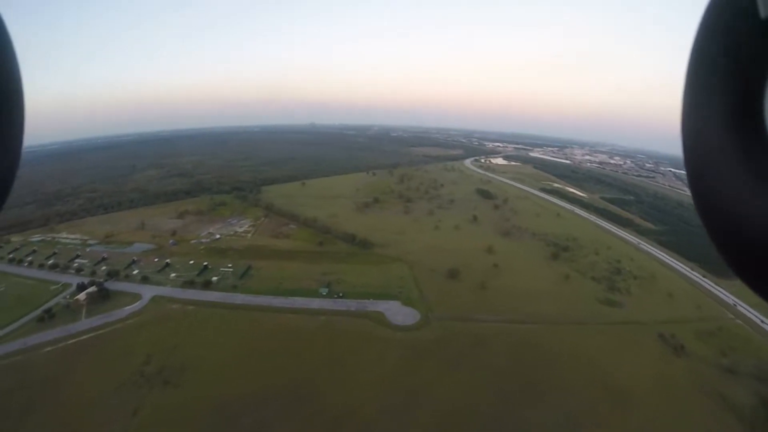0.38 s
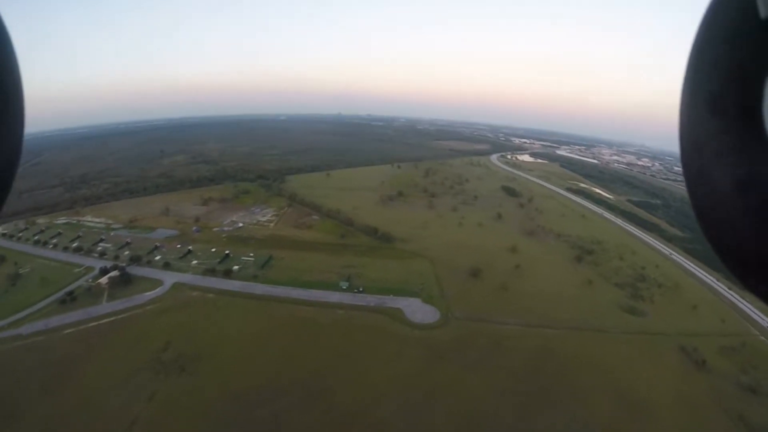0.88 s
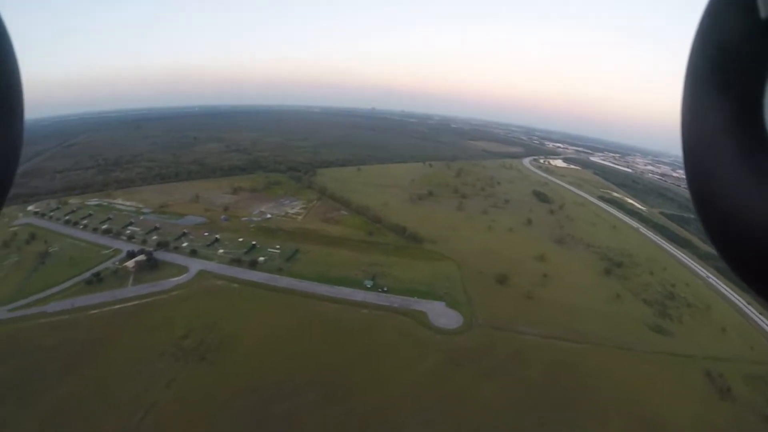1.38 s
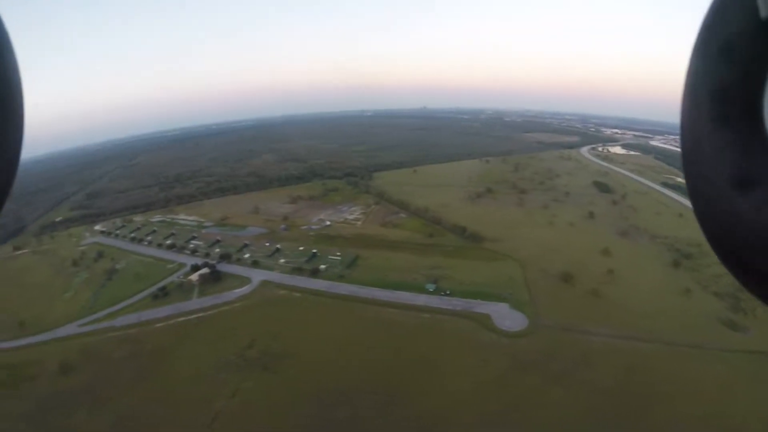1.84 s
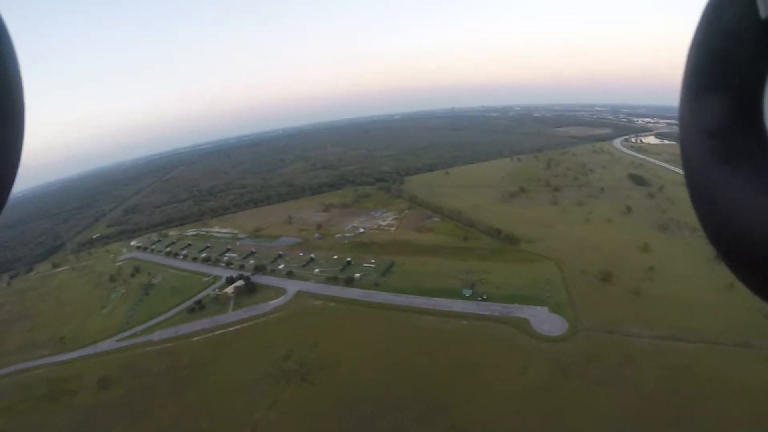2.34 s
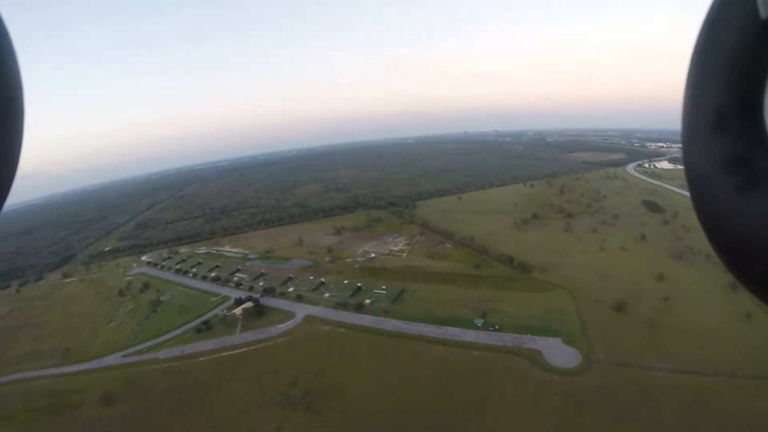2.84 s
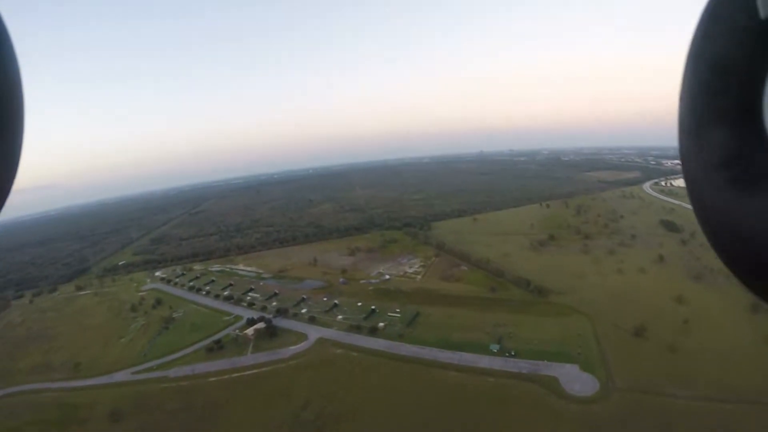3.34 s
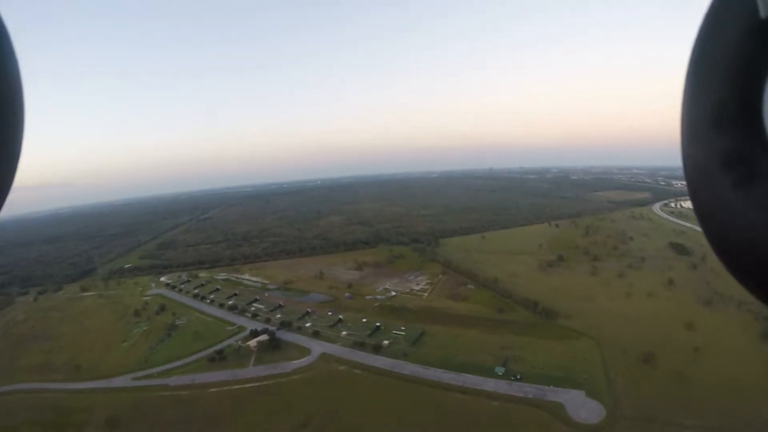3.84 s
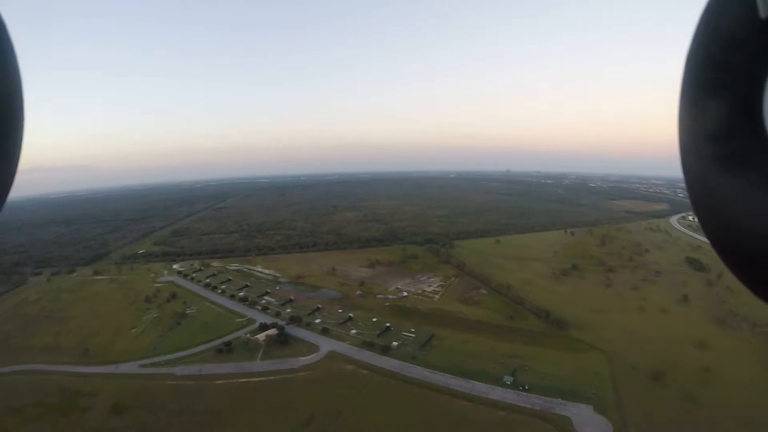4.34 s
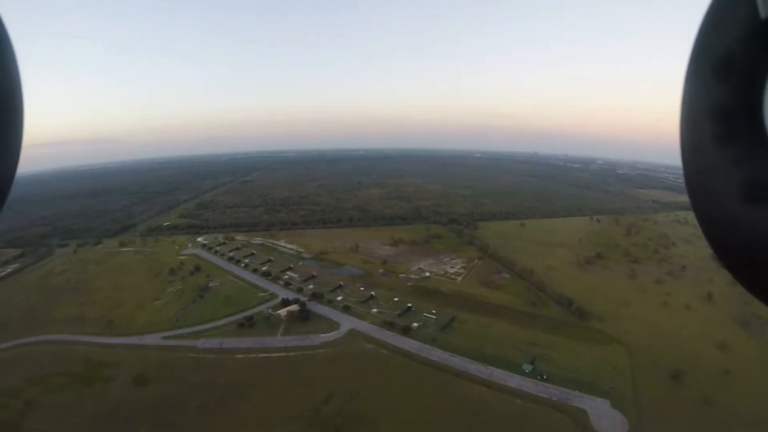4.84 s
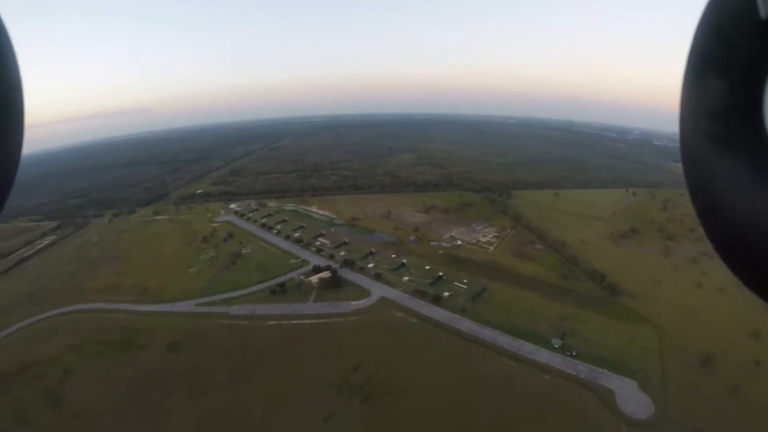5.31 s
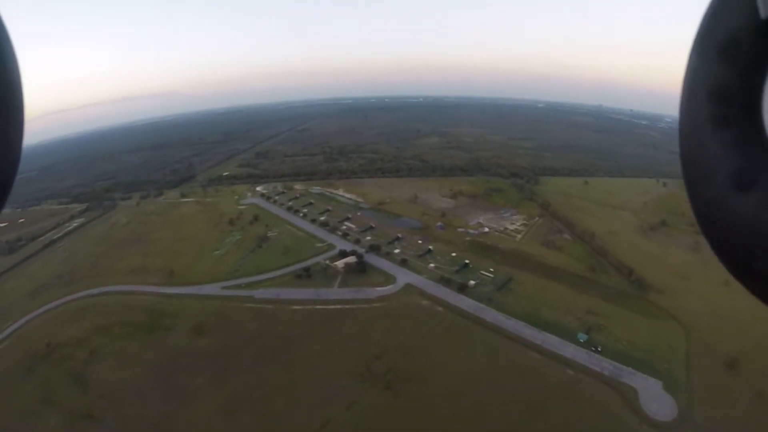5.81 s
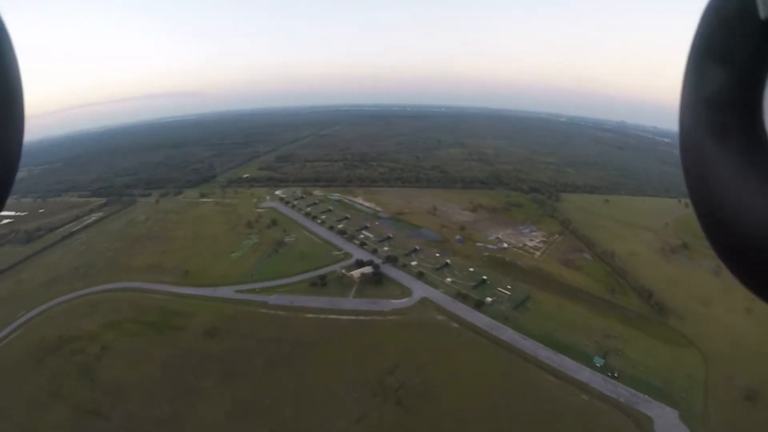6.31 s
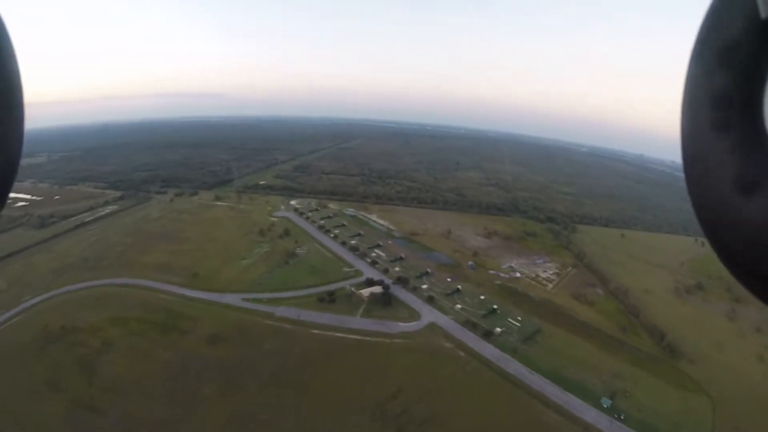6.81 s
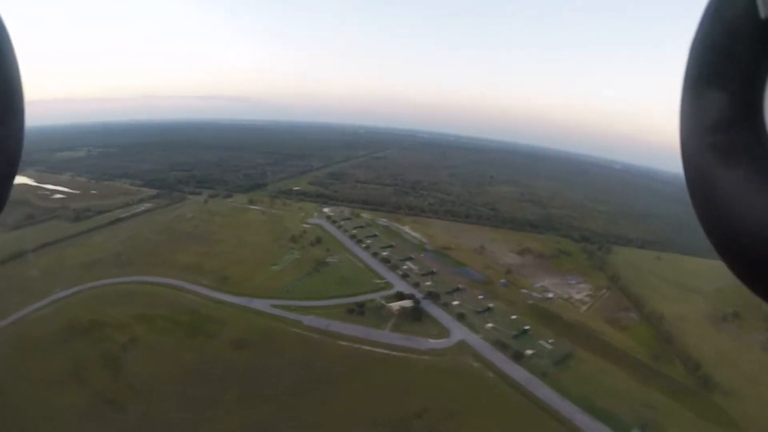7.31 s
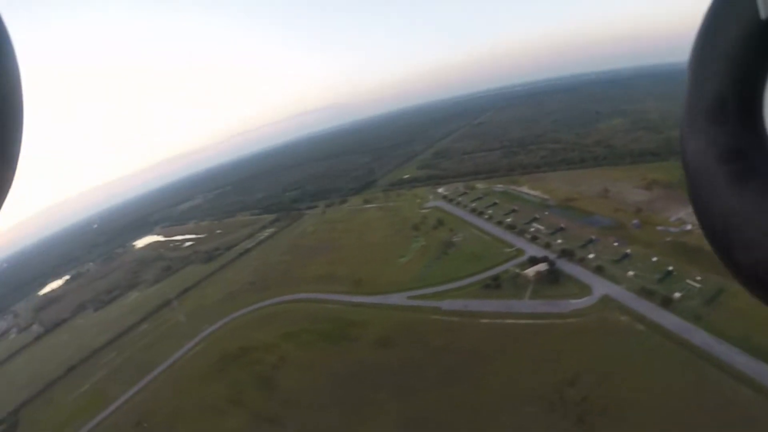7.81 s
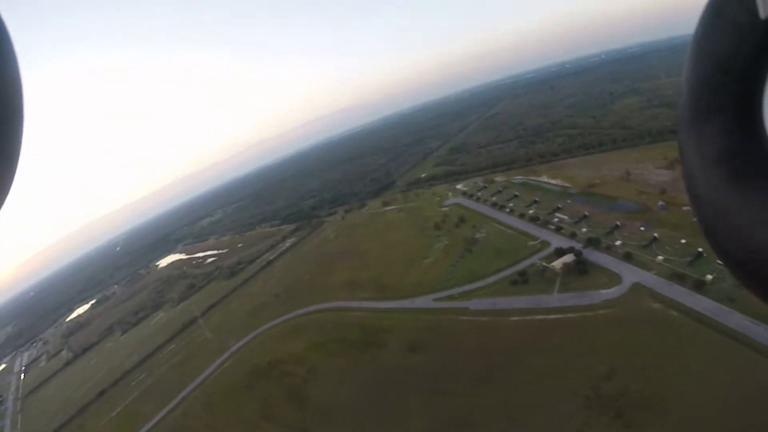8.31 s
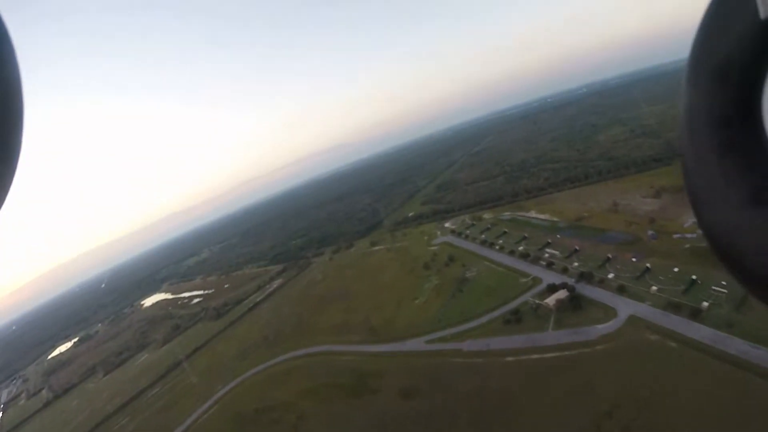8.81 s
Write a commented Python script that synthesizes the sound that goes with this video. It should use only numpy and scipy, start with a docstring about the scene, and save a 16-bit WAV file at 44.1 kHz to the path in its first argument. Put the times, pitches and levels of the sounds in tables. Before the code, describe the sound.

Close on-board drone of a little electric propeller plane, low buzzing hum with fluttering air hiss, faint high whine, thin ticks and rattling knocks.

```python
"""Model aeroplane in level flight

A small electric aeroplane, heard from a camera fixed to its frame, with no room around.
Gusts shake two wing bending modes; blows ring the camera housing as knocks and thin ticks.
Propeller wash is noise coloured by the housing: rush, blade hiss and a rattle at each blade pass.
The motor's magnets whine 42 times a turn; the shaft shakes the frame once a turn, with overtones."""
import sys
import numpy as np
from scipy import signal
from scipy.fft import rfft, irfft
from scipy.io import wavfile
from scipy.ndimage import uniform_filter1d

SR = 44100
rng = np.random.default_rng(int(sys.argv[2]) if len(sys.argv) > 2 else 0)


def master(y):
    """Save y as 16-bit WAV."""
    cut = np.clip(np.atleast_2d(y).T, -1, 1)
    pcm = np.round(cut * 32767)  # scale
    wavfile.write(sys.argv[1], SR, pcm.astype(np.int16))


def volts_from_decibels(level):
    """Turn decibel levels (scalar or array-like) into linear amplitude factors."""
    exponent = np.asarray(level, float) / 20
    return 10 ** exponent


N = 393359


def walk(rate_hz):
    """Random levels held 1 / rate_hz and slewed twice; rms about 0.73."""
    hold = int(SR / rate_hz)
    steps = np.repeat(rng.standard_normal(N // hold + 1), hold)
    return 0.99 * uniform_filter1d(uniform_filter1d(steps, hold), hold)[:N]


def unit(x):
    """Scale to rms 1."""
    return x / np.sqrt(np.mean(x ** 2))


def band(x, lo_hz, hi_hz):
    """Gentle band-pass."""
    return signal.sosfilt(signal.butter(2, [lo_hz, hi_hz], "band", fs=SR, output="sos"), x)


def curves(table):
    """Columns of a table as one value a sample."""
    time_s, *columns = np.transpose(table)
    return [np.interp(np.arange(N) / SR, time_s, column) for column in columns]


# stronger gusts on the wing: (time [s], level over the usual shake [dB])
GUSTS = [(0.0, 6), (2.4, 5), (6.0, 3.5), (7.5, 5.5), (8.4, 4)]


def gust_level():
    """Gust strength wanders; each stronger gust adds a bell-shaped swell in dB."""
    usual_db, swell_s = -31.5, 0.2
    t_s = np.arange(N) / SR
    swells_db = sum(db * np.exp(-((t_s - s) / swell_s) ** 2) for s, db in GUSTS)
    return usual_db + 1.0 * walk(3.3) + swells_db


# wing bending modes: (frequency [Hz], width of one filter pass [Hz], relative level [dB])
WING_MODES = [(76.2, 14.5, -0.5), (88.2, 15, -6)]


def wing(gust_db):
    """Gusts shake two bending modes: noise through each resonance twice."""
    bending = 0
    for hz, width_hz, db in WING_MODES:
        b, a = signal.iirpeak(hz, hz / width_hz, SR)
        noise = rng.standard_normal(N)
        mode = signal.lfilter(b, a, signal.lfilter(b, a, noise))
        bending = bending + volts_from_decibels(db) * unit(mode)
    return volts_from_decibels(gust_db) * bending


# housing response between resonances: (frequency [Hz], relative density [dB per Hz])
HOUSING_WALL = [(20, -14), (29, 0), (50, 0), (110, -6), (170, -8), (300, -1.5), (850, -4.5), (1050, -11),
                (2800, -12.5), (3100, -17.5), (4500, -24), (6300, -33), (6900, -31.5), (8800, -42.5),
                (12000, -49), (15000, -52)]
# housing resonances: (frequency [Hz], width [Hz], relative density at the top [dB per Hz])
HOUSING_MODES = [(209, 11, -2), (709, 71, 0), (1337, 58, -7.5), (1537, 220, -4.5), (1696, 210, -4),
                 (2036, 136, -2.5), (2214, 260, -8), (2643, 240, -11.5), (3517, 410, -15.5),
                 (4920, 290, -21.5), (5470, 360, -23.5), (5720, 340, -30), (6010, 300, -19.5),
                 (6300, 320, -23.5), (10280, 1500, -38), (13500, 800, -51)]


def housing_ring():
    """Causal (minimum-phase) response of the housing: a sloping wall plus steep-sided resonances."""
    size = 8192
    hz = np.maximum(np.arange(size // 2 + 1) * SR / size, 1)
    wall_hz, wall_db = np.transpose(HOUSING_WALL)
    power = volts_from_decibels(np.interp(np.log(hz), np.log(wall_hz), wall_db)) ** 2
    for mode_hz, width_hz, db in HOUSING_MODES:
        power = power + (volts_from_decibels(db) / (1 + (2 * (hz - mode_hz) / width_hz) ** 2)) ** 2
    # fold the cepstrum onto positive time
    cepstrum = irfft(np.log(power) / 2)
    cepstrum[1:size // 2] *= 2
    cepstrum[size // 2 + 1:] = 0
    return irfft(np.exp(rfft(cepstrum)))


def blows(table, lo_hz, hi_hz, contact_s):
    """Each blow is a short rough contact that rings one range of the housing."""
    ring = band(band(housing_ring()[:2000], lo_hz, hi_hz), lo_hz, hi_hz)
    t_s = np.arange(300) / SR
    contacts = rng.standard_normal((len(table), len(t_s))) * t_s * np.exp(-t_s / contact_s)
    out = np.zeros(N + len(ring) + len(t_s))
    for (time_s, peak_db), contact in zip(table, contacts):
        blow = np.convolve(contact, ring)
        i = int(time_s * SR)
        out[i:i + len(blow) - 1] += volts_from_decibels(peak_db) * blow[1:] / np.abs(blow).max()
    return out[:N]


# thin high ticks of the housing: (time [s], peak level [dB])
TICKS = [(0.8315, -31.5), (0.9961, -24), (1.1972, -28), (1.2301, -27), (1.3049, -32), (1.4905, -25),
         (1.6177, -26), (1.7255, -29), (1.8946, -28), (2.0313, -25), (2.5706, -29), (2.8739, -25),
         (2.9991, -29), (3.1188, -26), (3.3368, -28), (5.1891, -29), (6.328, -32), (6.759, -27),
         (6.9067, -27), (7.1576, -27), (7.1955, -32), (8.5081, -28), (8.528, -29), (8.6847, -25)]


def ticks():
    """Blows that ring the upper housing resonances."""
    return blows(TICKS, lo_hz=4300, hi_hz=5300, contact_s=0.0012)


# loudest knocks of the housing: (time [s], peak level [dB])
KNOCKS = [(0.171, -7), (0.2773, -8), (0.412, -11.5), (0.591, -10), (0.7801, -17), (1.065, -18),
          (2.4698, -11), (3.0556, -12), (5.5493, -8), (6.9471, -10), (6.9696, -6), (7.1586, -6),
          (7.196, -6), (7.2707, -10), (7.423, -12), (7.5428, -6)]


def knocks():
    """Blows that ring the middle housing resonances."""
    return blows(KNOCKS, lo_hz=1130, hi_hz=2260, contact_s=0.00092)


# flight: (time [s], blade-pass tone level [dB rms], relative rattle level [dB],
#          motor-mount buzz about its usual level [dB])
FLIGHT = [(0.0, -21, -21, 4), (0.6, -21.5, -22.5, 3.5), (1.2, -23.5, -22.5, 2.5), (1.5, -25.5, -21, 5.5),
          (2.1, -20.5, -24, -2), (2.5, -24, -23, 3), (3.0, -20.5, -23.5, -1), (3.6, -21, -23.5, -3),
          (4.2, -20, -23.5, -8), (5.1, -18, -22, -5), (5.7, -19, -23, -5), (6.3, -20.5, -23.5, -2),
          (6.7, -22, -22.5, -1), (7.4, -24, -21, 3), (7.8, -19.5, -24.5, -11), (8.3, -19, -23.5, 5),
          (8.92, -20, -28, 3)]


def flight_levels():
    """Blade load, rattle and mount buzz, interpolated over the flight."""
    return curves(FLIGHT)


def blade_hiss(turn_rad):
    """The tips hiss twice a turn, one blade a little louder."""
    swing_db = 8.8 * np.cos(2 * turn_rad - 1.6) + 1.8 * np.cos(turn_rad - 1.2)
    return band(rng.standard_normal(N), 7100, 15500) * volts_from_decibels(swing_db)


def blade_rattle(turn_rad, rattle_db):
    """Every blade pass gives a short rasp of its own size; one blade shakes harder."""
    passes = turn_rad / np.pi + 0.4
    since = passes % 1  # in blade passes
    count = N // 100
    size_db = 3.6 * np.clip(rng.standard_normal(count), -3, 1.8) + 2.5 * (np.arange(count) % 2)
    rasp = volts_from_decibels(size_db[passes.astype(int)]) * since * np.exp(-since / 0.24)
    low = band(rasp * rng.standard_normal(N), 1127, 3010)
    high = band(rasp * volts_from_decibels(2.8 * walk(50)) * rng.standard_normal(N), 3540, 6300)
    return volts_from_decibels(rattle_db) * (volts_from_decibels(14) * unit(low) + volts_from_decibels(12.5) * unit(high))


def wash(turn_rad, rattle_db):
    """Even rushing air plus hiss and rattle that flutter together, coloured by the housing."""
    wash_db_rms = -21.5
    rush = rng.standard_normal(N) * volts_from_decibels(0.5 * walk(30))
    hiss = volts_from_decibels(-3) * unit(blade_hiss(turn_rad))
    rattle = blade_rattle(turn_rad, rattle_db)
    flutter = volts_from_decibels(1.2 * walk(16))
    stir = rush + flutter * (hiss + rattle)
    return volts_from_decibels(wash_db_rms) * unit(signal.fftconvolve(stir, housing_ring())[:N])


COGS_PER_TURN = 42
# motor: (time [s], magnet whine frequency [Hz])
MOTOR = [(0.0, 5594), (1.2, 5591), (2.1, 5592.5), (2.7, 5595.5), (3.3, 5590), (4.0, 5579), (4.8, 5568),
         (5.1, 5566.5), (5.5, 5570.5), (6.3, 5582), (6.9, 5585.5), (7.8, 5576.5), (8.7, 5584), (8.92, 5584)]


def shaft_angle():
    """Shaft angle in radians, integrated from the whine frequency over the cogs per turn."""
    start_rad = -1.5
    whine_hz, = curves(MOTOR)
    return start_rad + 2 * np.pi * np.cumsum(whine_hz / COGS_PER_TURN) / SR


def magnet_whine(turn_rad):
    """The magnets pull once per cog: a sine locked to the shaft, wavering in level."""
    level_db_rms = -45 + 0.78 * walk(20)
    return np.sqrt(2) * volts_from_decibels(level_db_rms) * np.cos(COGS_PER_TURN * turn_rad)


# shaft orders that answer the flight: (multiple of shaft rate, usual level [dB rms],
#     response to blade tone [dB/dB], to rattle [dB/dB], to mount buzz [dB/dB])
FLIGHT_ORDERS = [(1, -16.5, 0.01, 0.22, -0.015), (3, -19.5, 0.14, 0.13, -0.032),
                 (4, -32.5, 0.35, -0.2, 0.01), (5, -36, -0.2, -0.1, 0.072), (6, -37.5, 0, -1.3, 0.45),
                 (12, -36.5, -0.2, 3, 0.056), (13, -35, -0.1, -0.4, 0.93)]


def flight_orders(blade_db, rattle_db, buzz_db):
    """Blade load, rattle and mount buzz push these orders up or down, each by its own share."""
    blades, blade_usual_db, rattle_usual_db = 2, -21, -23
    bite_db = blade_db - blade_usual_db
    shake_db = rattle_db - rattle_usual_db
    orders = [(blades, blade_db)]
    for k, db, per_bite, per_shake, per_buzz in FLIGHT_ORDERS:
        orders.append((k, db + per_bite * bite_db + per_shake * shake_db + per_buzz * buzz_db))
    return orders


# steadier shaft overtones: (multiple of shaft rate, level before wavering [dB rms])
OVERTONES = [(7, -37), (8, -45), (9, -43), (10, -42), (11, -37), (14, -39.5), (15, -43), (16, -41),
             (18, -43), (19, -45.5), (20, -42), (21, -50), (36, -72), (40, -61), (41, -60), (43, -72),
             (44, -59), (46, -70), (84, -72)]


def shaft(turn_rad, orders):
    """Orders 1 to 4 make one push a turn, 5 to 7 are inverted, higher ones start anywhere;
    all but the lowest waver clearly in level and timing."""
    out = 0
    for k, db in list(orders) + list(OVERTONES):
        loose = min(k / 9.7, 1)
        if k <= 4:
            start_rad = 0
        elif k <= 7:
            start_rad = np.pi  # inverted: blunts the push
        else:
            start_rad = rng.uniform(0, 2 * np.pi)
        if k == 2:
            start_rad -= 0.55  # blade-pass tone comes by air, behind the frame shake
        phase_rad = start_rad + 0.5 * loose * walk(6)
        waver_db = (-0.1 + 2.0 * loose) * walk(12) + 1.5 * loose ** 2 * walk(1.505)
        out = out + np.sqrt(2) * volts_from_decibels(db + waver_db) * np.cos(k * turn_rad + phase_rad)
    return out


def scene():
    """Wing shake, ticks, knocks, propeller wash, magnet whine and shaft tones add up at the microphone."""
    blade_db, rattle_db, buzz_db = flight_levels()
    turn_rad = shaft_angle()
    mix = wing(gust_level()) + ticks() + knocks()
    mix = mix + wash(turn_rad, rattle_db) + magnet_whine(turn_rad)
    mix = mix + shaft(turn_rad, flight_orders(blade_db, rattle_db, buzz_db))
    return mix[None]


def roll_off(x):
    """The treble ends steeply here."""
    return signal.sosfilt(signal.butter(12, 15140, fs=SR, output="sos"), x)


def record(dry):
    """The input stage bends smoothly towards its ceiling, rounding only the tallest peaks."""
    ceiling = 1.05
    rounded = dry / (1 + np.abs(dry / ceiling) ** 4) ** (1 / 4)
    return roll_off(rounded)


dry = scene()
out = record(dry)
master(out)
```